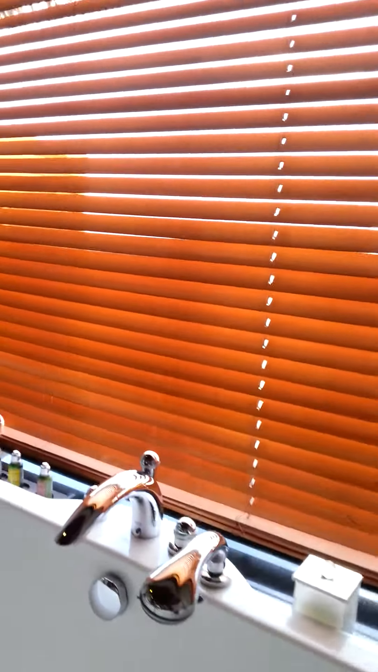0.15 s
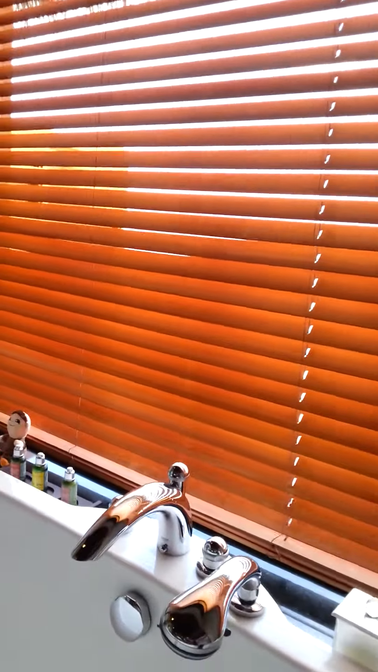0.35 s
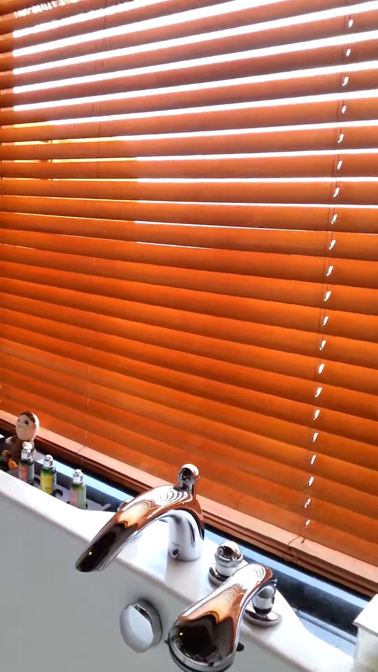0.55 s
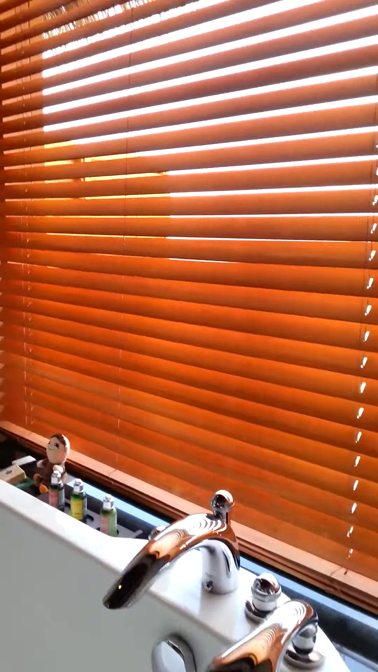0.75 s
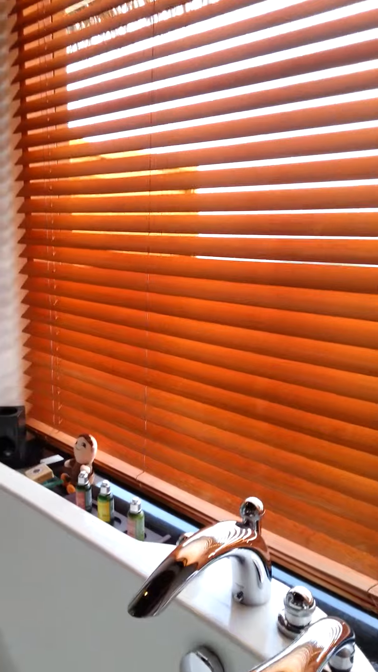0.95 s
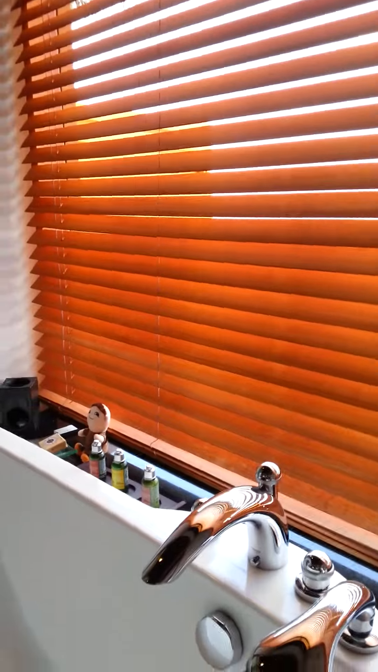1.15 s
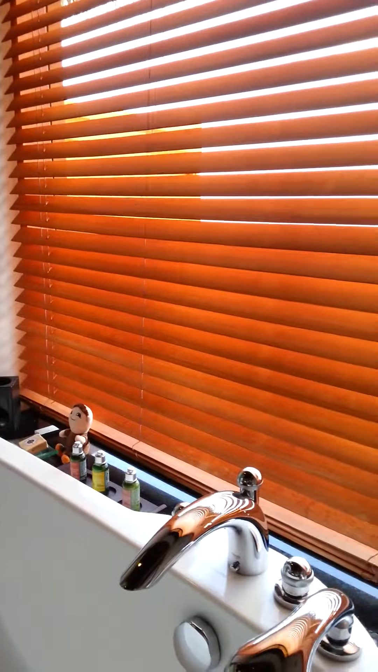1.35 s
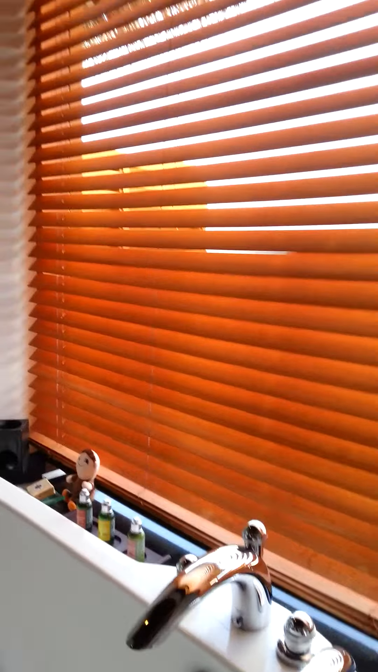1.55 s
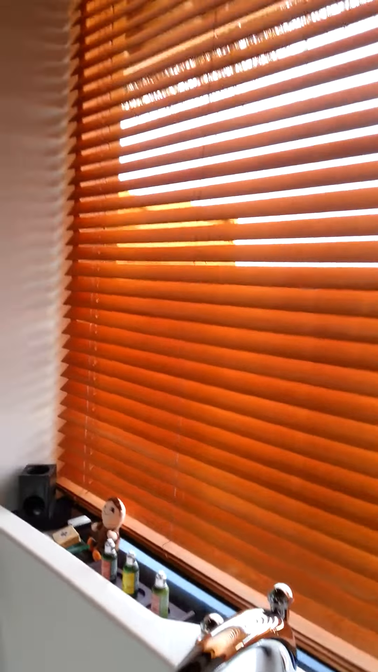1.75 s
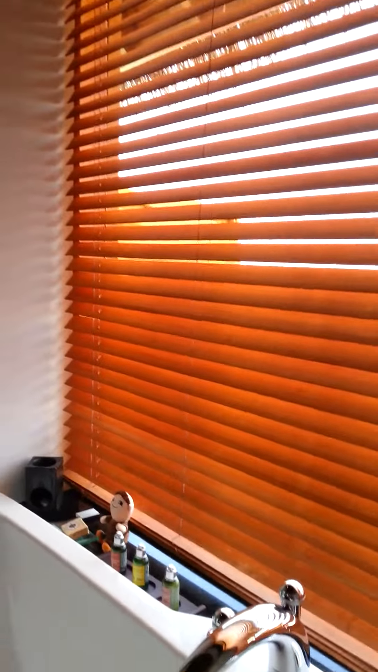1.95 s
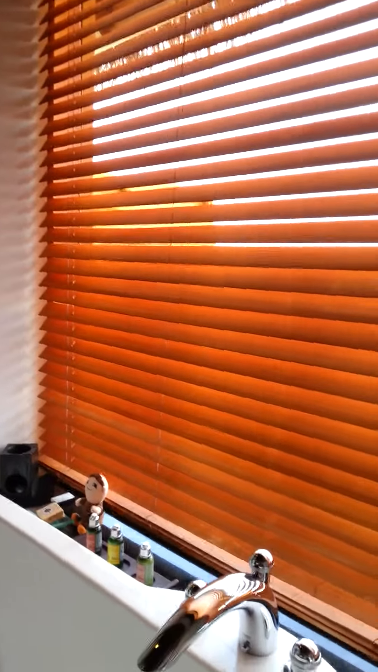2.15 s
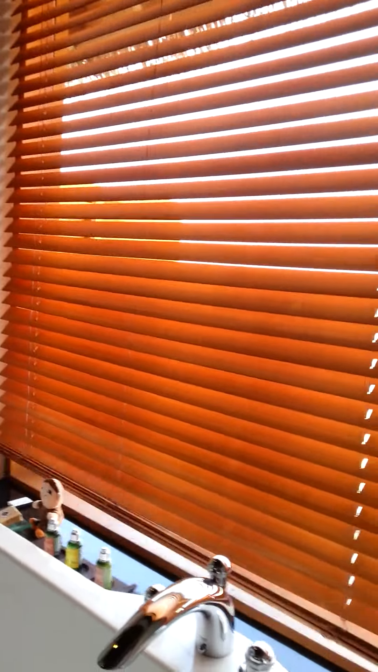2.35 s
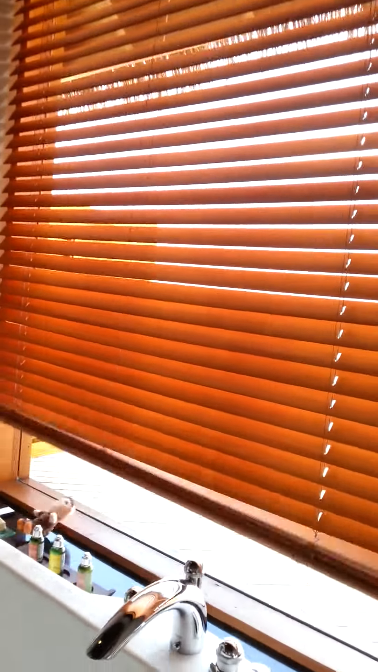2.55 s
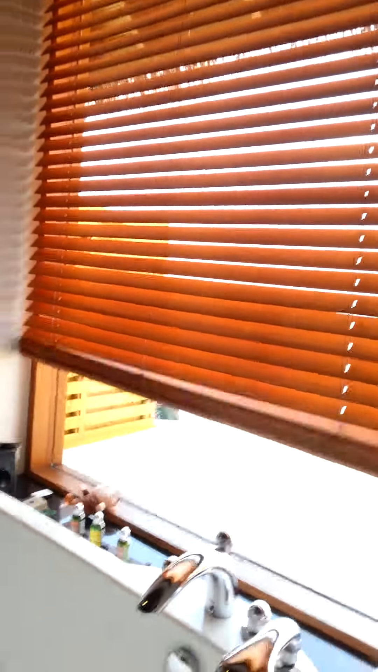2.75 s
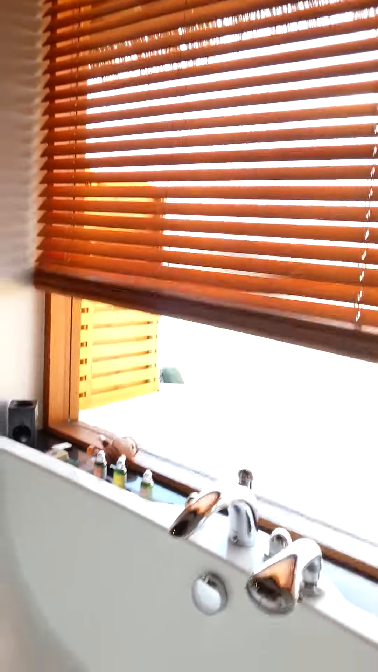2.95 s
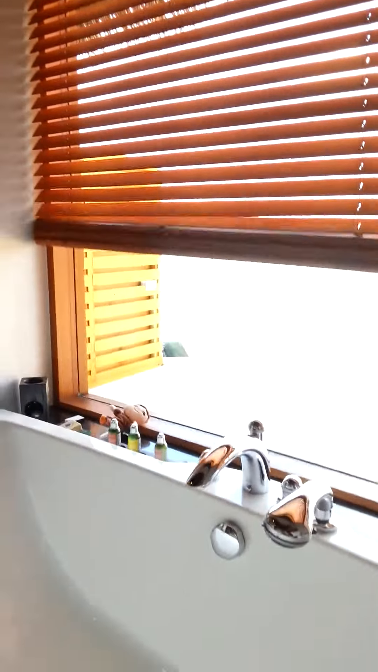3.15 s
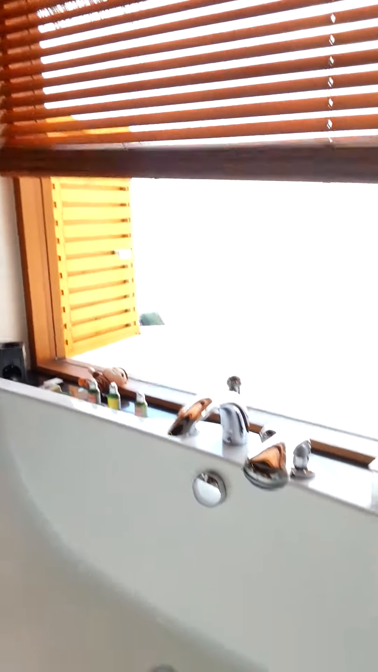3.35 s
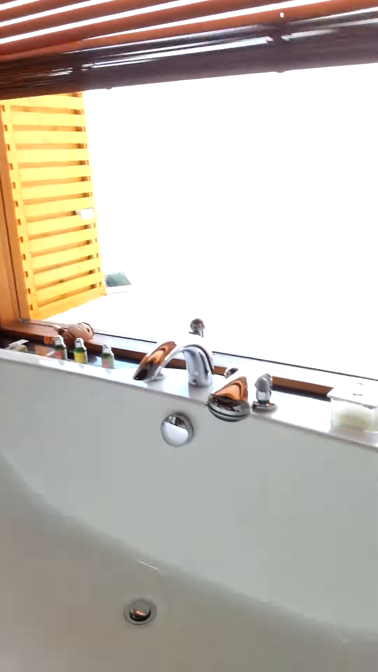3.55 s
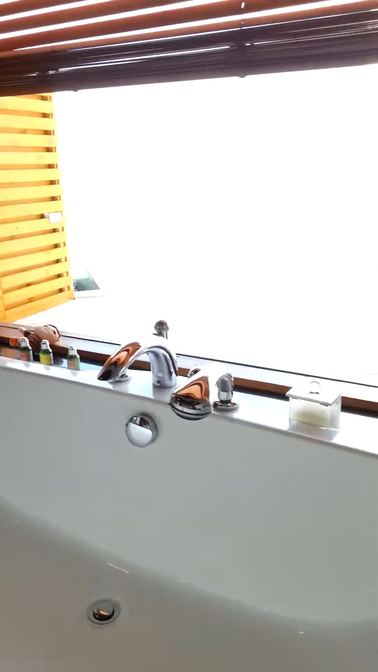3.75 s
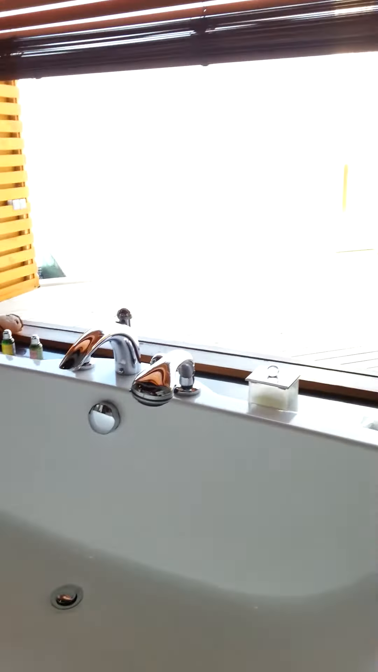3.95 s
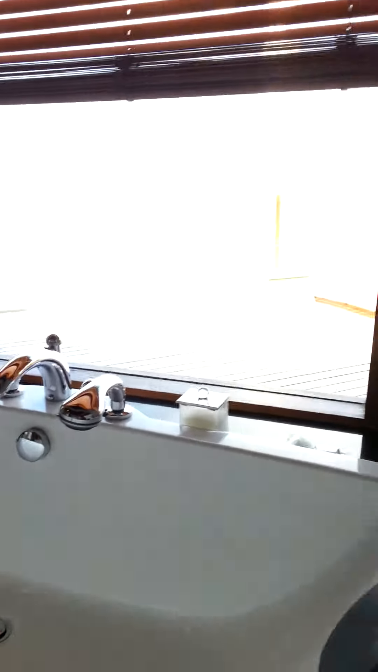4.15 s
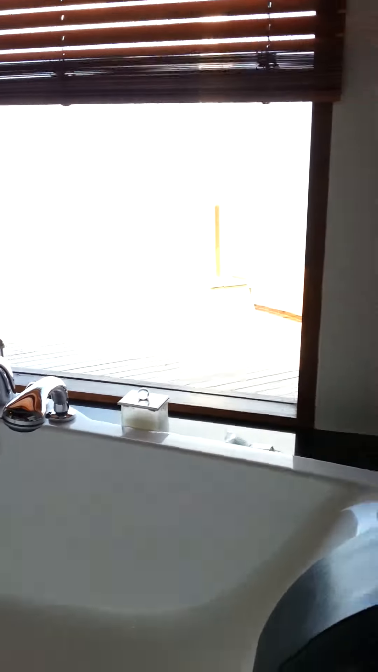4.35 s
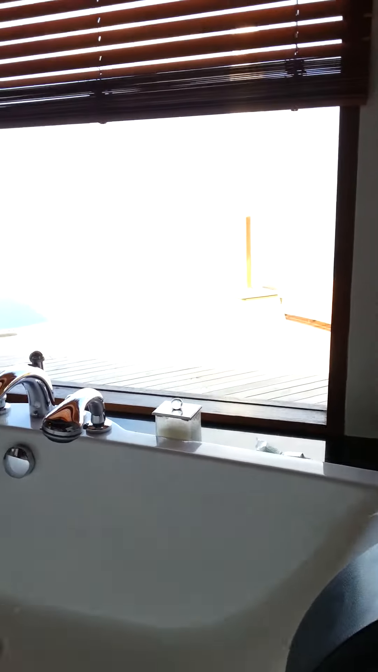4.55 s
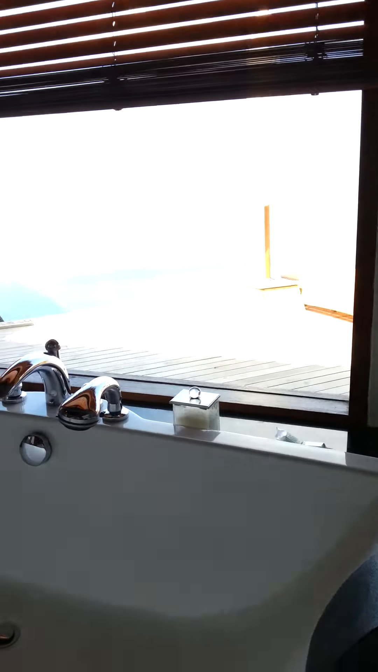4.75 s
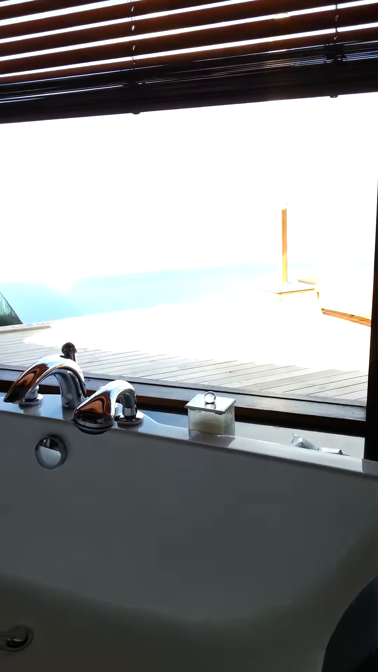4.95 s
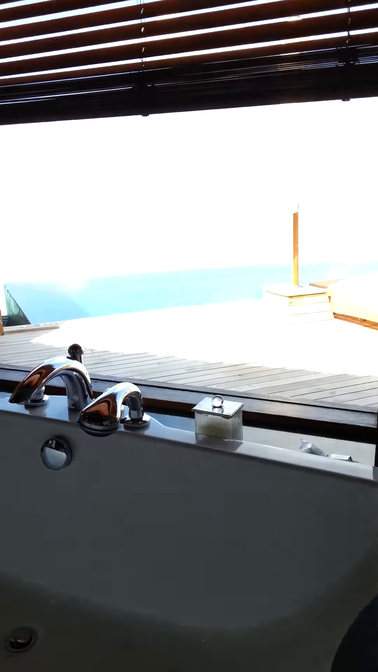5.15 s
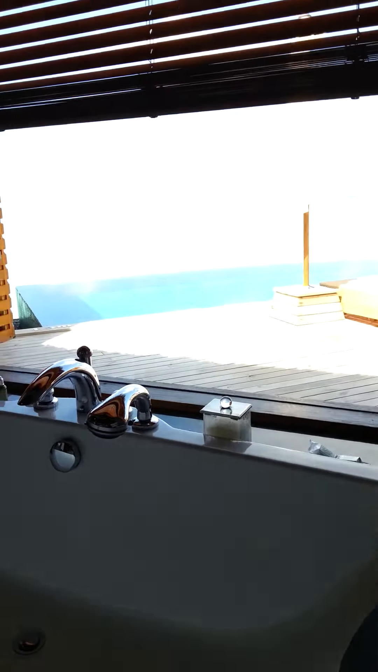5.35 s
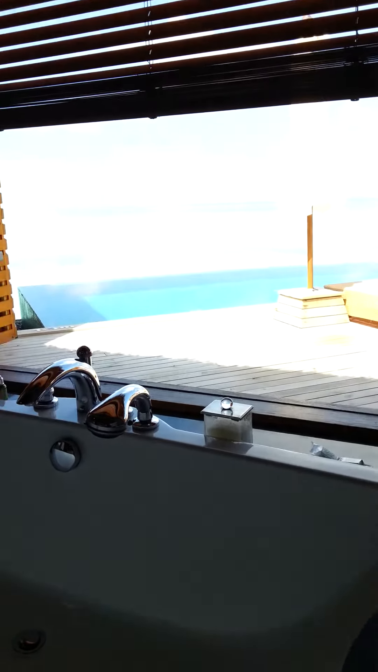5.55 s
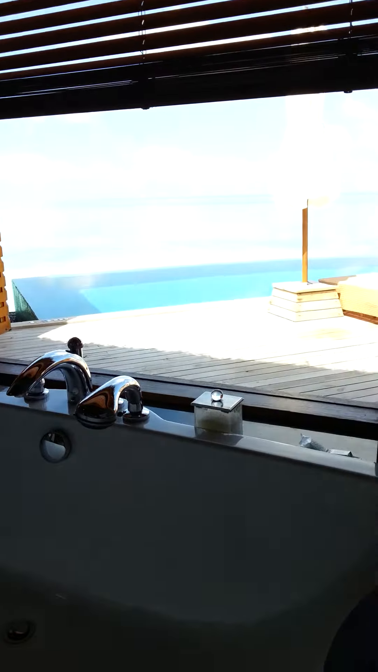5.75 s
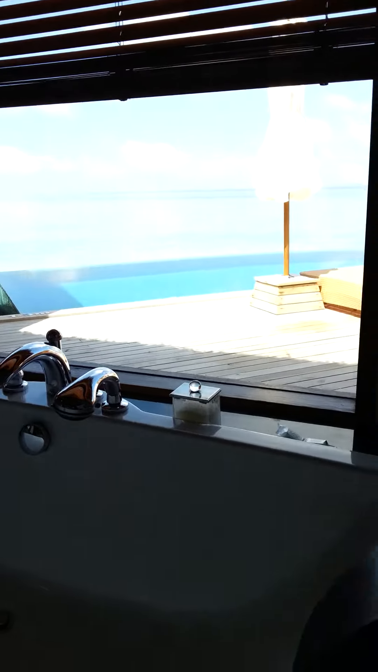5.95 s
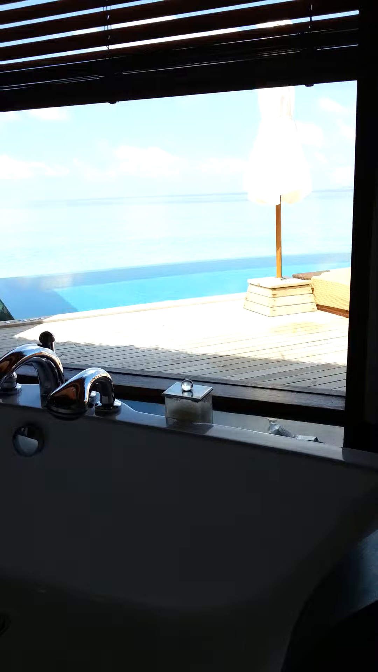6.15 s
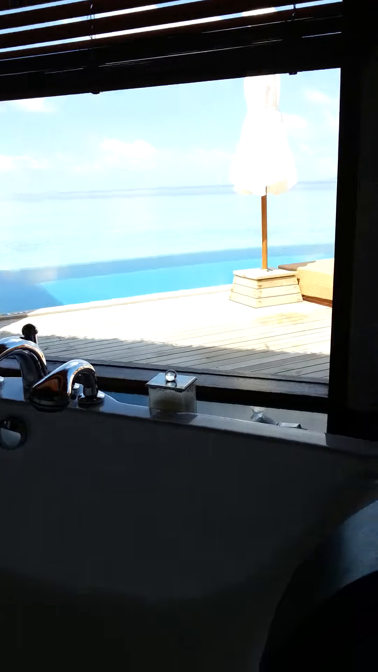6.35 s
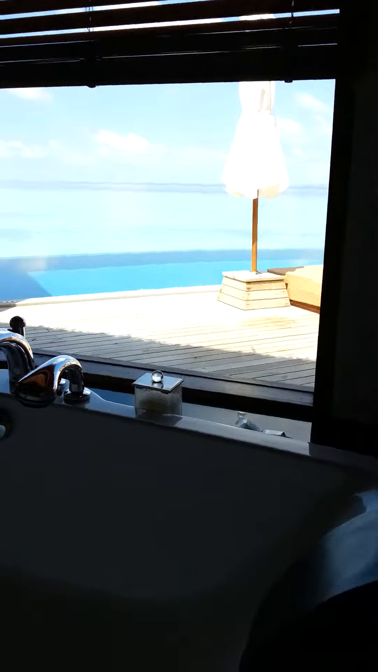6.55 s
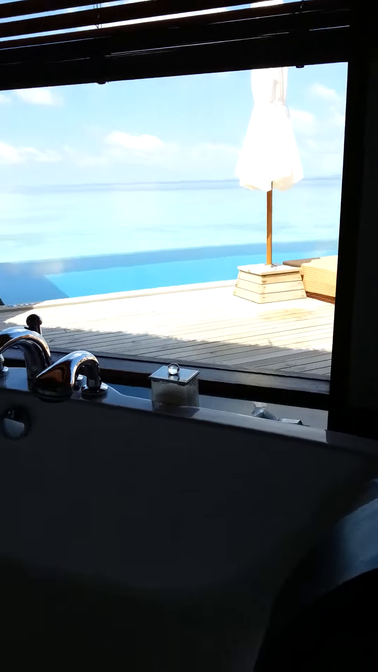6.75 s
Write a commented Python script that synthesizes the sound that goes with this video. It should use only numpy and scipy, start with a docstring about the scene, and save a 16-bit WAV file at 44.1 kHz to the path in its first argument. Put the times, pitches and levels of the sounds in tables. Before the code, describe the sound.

A hard-walled bathroom hums quietly, with steady ventilation, wavering low fan tones and slight hiss throughout. From 0 to 1.9 s there are only faint cord brushes and tiny taps around 0.1 and 0.8-1.2 s. At about 2.0 s the cord's slack is taken up with a small tap and soft bump, and the blind lifts gently. At 2.4 s a long haul bursts out very loudly: wooden slats clack and rattle densely, bright and sharp, with short hollow booms and cord hiss, easing towards 3.1 s. A second, shorter haul starts at 3.2 s, woodier, fading by 4 s into scraping. Dull bumps against the frame follow at 3.8, 3.9 and 4.1 s, faint squeaks near 4.4-4.6, and soft knocks at 4.9 and 5.1. A tiny bright close tick comes at 5.97 s, a knock and tap at 6.3, and a faint brush at 6.8.

```python
"""Bathroom with hard walls: a wooden venetian blind is hauled up over a low hum and steady ventilation.
First come faint cord brushes and light taps; then the slack is taken up and the blind lifts gently.
In two long hauls, slats of shaped noise clack and rattle, the stack booms in decaying sines, the cord hisses.
The stack bumps its frame, scrapes and settles; noise through narrow resonances squeaks faintly.
Late on, a tiny bright tick sounds close to the microphone, then a last knock, a tap and a soft brush."""
import sys
import numpy as np
from scipy import signal
from scipy.fft import rfft, irfft, next_fast_len
from scipy.io import wavfile
from scipy.ndimage import uniform_filter1d, map_coordinates

SR = 44100
rng = np.random.default_rng(int(sys.argv[2]) if len(sys.argv) > 2 else 0)


def write(x):
    x = np.atleast_2d(x).T
    wavfile.write(sys.argv[1], SR, np.round(np.clip(x, -1, 1) * 32767).astype(np.int16))


N = 303893
TIME = np.arange(N) / SR  # seconds into the scene
AGE = TIME[:SR * 3 // 4]  # seconds since a contact


# pulls on the cord: slack, a gentle lift, two long hauls:
# (start [s], speeding up [s], hold [s], slowing down [s], top speed [0-1])
PULLS = [(1.981, .06, .06, .25, 0.16), (2.091, .24, 0.07, .1, .4), (2.406, 0.042, .25, 1, 0.91),
         (3.21, 0.075, 0.068, .64, .8)]
# slats slapping onto the stack: (time [s], level [dB], low wood [dB re level], bright edge [dB re level],
# balance of the part shared by both sides over the part that differs [dB])
CLACKS = [(2.3094, -15, -8, -26.5, -1), (2.3804, -10, -12, -24, 8), (2.42, 0, -18.5, -9.5, 0),
          (2.4861, 5, -6.5, -24, -1.5), (2.5438, -1, -20, -17, 10.5), (2.67, 0, -21, -11.5, 3),
          (2.7898, -2, -26.5, -16, 4), (2.9029, -6, -20, -10, -4), (2.9263, -5.5, -28, -6, 2),
          (2.995, 0.5, -10, -8.5, 0.5), (3.2886, -2.5, -2, -22, 2), (3.3019, -0.5, -10, -28, 2),
          (3.3598, 1.5, -19, -12, 0.5), (3.38, -1, -23, -17, 1.5), (3.4516, -2, -16, -30, 1),
          (3.5233, -7.5, -2.5, -28, 0.5)]
# colours of slat wood, stacked slats and bright edges: (frequency [Hz], relative density [dB per Hz])
SLAT_COLOUR = [(240, -36.5), (400, -8), (638, -2), (731, -5.5), (1020, -3.5), (1510, -5.5), (1700, -9),
               (2070, -1.5), (4020, -7), (5040, -5.5), (6130, -11.5), (8290, -14.5), (12800, -23.5),
               (14700, -44)]
STACK_COLOUR = [(25, -33), (60, -26), (115, -11), (160, -4.5), (210, -0.5), (255, -7), (315, 3), (360, 2.5),
                (620, -1.5), (800, -2), (1200, -5), (1650, -0.5), (2100, -2), (3500, -51.5)]
EDGE_COLOUR = [(3000, -51), (6000, -4.5), (8200, 4.5), (11000, -1.5), (13200, -0.5), (14500, -8.5)]
# where the blind is heard: (frequency [Hz], left over right [dB])
LEAN = [(200, 0.5), (700, 0.2), (2600, 2.5), (5000, 0.8), (9000, -4), (14000, -1.5)]
RATTLE_DB, RUMBLE_DB, CORD_DB = -16, -30, -25  # slats, stack and cord at speed 1, before colouring
# each amplitude grows as this power of speed, so faster is brighter
RATTLE_POWER, RUMBLE_POWER, CORD_POWER = 2.08, 0.92, 2.74


def blind():
    """Slats slap and rattle, the stack rumbles and the cord hisses; rattles follow the pull's speed."""
    strokes = [top * stroke(start, rise, hold, slowing) for start, rise, hold, slowing, top in PULLS]
    haul_db = speed_db(np.max(strokes, axis=0))
    ring_db, scatter_db = 3.6, 3  # unevenness of resonances, of single contacts

    slat_rattle = rattle(RATTLE_DB + RATTLE_POWER * haul_db, rate=320, scatter_db=scatter_db,
                         t60=0.043, room_db=-3.0)
    stack_rumble = rattle(RUMBLE_DB + RUMBLE_POWER * haul_db, rate=350, scatter_db=scatter_db,
                          t60=0.04, room_db=-3)
    cord_hiss = rattle(CORD_DB + CORD_POWER * haul_db, rate=250, scatter_db=scatter_db,
                       t60=0.016, room_db=-7.5)
    slats = patchy(slat_rattle, ring_db)
    stack = patchy(stack_rumble, ring_db)
    edges = patchy(cord_hiss, ring_db)

    for s, db, wood_db, edge_db, shared_db in CLACKS:
        # spread() takes row 0 as the shared part and row 1 as the difference
        gain = amp(db + np.array([[shared_db], [-shared_db]]) / 2)
        slap = one_slat(blow(t60=0.037, rise=0.0012, room_db=-10.0), ring_db)
        thump = blow(t60=0.024, rise=0.00032, room_db=-10.5)
        click = blow(t60=0.034, rise=0.00026, room_db=-14.5)
        add(slats, s, gain * amp(-7.5) * slap)
        add(stack, s, gain * amp(wood_db - 9.0) * thump)
        add(edges, s, gain * amp(edge_db - 6.0) * click)

    wood = spread(coloured(slats, SLAT_COLOUR) + coloured(stack, STACK_COLOUR) + coloured(edges, EDGE_COLOUR))
    return filtered(wood, lambda hz: amp(np.outer([1, -1], along(LEAN, hz)) / 2))


# the whole stack jolting on its cords: (time [s], level before trim [dB], pitch [Hz])
JOLTS = [(2.484, -18, 342), (2.575, -12, 211), (2.655, -10.5, 483), (3.075, -15.5, 423), (3.286, -9, 304.4),
         (3.397, -12.5, 335), (3.547, -13, 315)]
JOLT_LOW_HZ = 110  # the stack is too small to radiate well below this


def jolts(t60, linger_db):
    """The stack booms briefly at one low, slightly unsteady pitch, which lingers in the room."""
    out = np.zeros((2, N))
    for s, db, pitch_hz in JOLTS:
        decay = amp(-60 * AGE / t60) + amp(linger_db - 60 * AGE / .5)
        ring = decay * (1 - np.exp(-AGE / 0.0025))
        drift = 0.02 * np.cumsum(rng.standard_normal(len(AGE)))
        offset = 0.14 * rng.standard_normal((2, 1))  # each side hears its own phase
        add(out, s, amp(db - 4) * ring * np.sin(2 * np.pi * pitch_hz * AGE + drift + offset))
    return filtered(out, lambda hz: (1j * hz / (JOLT_LOW_HZ + 1j * hz)) ** 2)


# light taps of cord, lock and slat edges:
# (time [s], level before trim [dB], pitch [Hz], room echo [dB re contact])
TAPS = [(.093, -36, 4200, -25), (.822, -41, 2130, -11), (.902, -37, 2380, -15), (1.073, -40.5, 4940, -8),
        (1.1414, -36, 3600, -13), (1.972, -27.5, 2860, -9), (2.0253, -15.5, 2150, -10.5),
        (2.1335, -27, 1800, -9.5), (2.234, -23.5, 840, -24), (2.2604, -20.5, 770, -20.5),
        (2.3916, -4, 5000, -23), (2.4253, 1, 4200, -18), (2.711, 0, 8400, -25), (2.732, 0.5, 3530, -26),
        (3.052, -7.5, 8700, -14), (3.216, -15, 8500, -15), (3.2612, -6, 6600, -14.5),
        (3.5544, -13.5, 6880, -12), (3.6228, -9.5, 2880, -15), (4.2935, -39.5, 2670, -7),
        (6.3697, -24, 2940, -17)]


def taps():
    """Light contacts excite one broad resonance each, some dry and some echoing in the room."""
    out = np.zeros((2, N))
    for s, db, pitch_hz, room_db in TAPS:
        contact = blow(t60=0.03, rise=0.00025, room_db=room_db)
        add(out, s, amp(db - 7.5) * coloured(contact, resonance(pitch_hz)))
    return spread(out)


# the bottom rail bumping the frame: (time [s], level before trim [dB], hard edge [dB re level])
KNOCKS = [(2.025, -27.5, -15), (3.784, -21, -25), (3.933, -24, -21), (4.102, -25.5, -16),
          (4.904, -20.5, -16.5), (5.134, -23, -21), (6.311, -18, -19)]
# colours of the frame and the rail: (frequency [Hz], relative density [dB per Hz])
FRAME_COLOUR = [(70, -37), (120, -17), (165, -3), (210, 6.5), (270, -10), (350, 3), (490, -5.5),
                (635, -1.5), (820, -11), (1250, -11.5), (1650, -8), (2100, -16), (4000, -39)]
RAIL_COLOUR = [(900, -13), (1800, 0), (2600, 0), (3500, -3), (4600, -12), (9000, -30), (14000, -33)]
# after each bump the rail lands once more, softer and duller
REBOUND_S, REBOUND_LOSS_DB, REBOUND_DULL_DB = .043, 7.5, 11


def knocks():
    """The padded stack bumps the frame and rebounds once; most sound comes by way of the walls."""
    frame, rail = np.zeros((2, 2, N))
    rebounds = [(s + REBOUND_S, db - REBOUND_LOSS_DB, edge_db - REBOUND_DULL_DB) for s, db, edge_db in KNOCKS]
    for s, db, edge_db in list(KNOCKS) + rebounds:
        add(frame, s, amp(db - 9) * blow(t60=0.15, rise=0.0069, room_db=-4.0))
        add(rail, s, amp(db + edge_db - 1.5) * blow(t60=0.13, rise=0.003, room_db=-5))
    return spread(coloured(frame, FRAME_COLOUR) + coloured(rail, RAIL_COLOUR))


# colour of the scrape: (frequency [Hz], relative density [dB per Hz])
RUBBING_COLOUR = [(120, -25), (220, 0), (340, 3), (620, 1), (900, -5.5), (1200, -20), (1570, -8),
                  (1850, -7), (2500, -19.5), (5000, -26), (12000, -39)]
SETTLE_START_S, SETTLE_DB, SETTLE_POWER = 3.483, -36.5, 1.36  # the stack's last swing along the frame


def settling():
    """The swaying stack scrapes softly along the frame in dense contacts until it hangs still."""
    swing = stroke(SETTLE_START_S, rise=0.14, hold=0.12, slowing=0.77)
    level_db = SETTLE_DB + SETTLE_POWER * speed_db(swing)
    scrape = rattle(level_db, rate=1200, scatter_db=1.5, t60=0.054, room_db=-3.5)
    return spread(coloured(scrape, RUBBING_COLOUR))


# squeaks of the swaying blind: (centre time [s], swell length [s], level [dB])
SQUEAKS = [(4.397, .035, -49), (4.498, .028, -50), (4.57, .05, -54)]
# resonances of the squeak: (frequency [Hz], width at -6 dB [Hz], relative level [dB])
SQUEAK_MODES = [(1900, 250, -2), (2350, 200, -1), (2620, 220, 1), (4070, 140, 0)]
# soft brushing of the cord: (centre time [s], swell length [s], level [dB])
BRUSHES = [(.35, 0.47, -58), (1.158, 0.077, -51.5), (2.165, 0.051, -43.5), (4.327, .07, -53),
           (4.5, 0.12, -54.5), (6.805, 0.12, -47)]
# colour of the brushing: (frequency [Hz], relative density [dB per Hz])
BRUSH_COLOUR = [(500, -4), (2200, 2), (5000, -3.5), (8000, -11), (14000, -11)]


def cord():
    """Faint rubbing: noise through narrow resonances squeaks, and broader noise swells brush."""
    def squeak_body(f):
        return sum(amp(db) / (1 + 2j * (f - hz) / width) ** 2 for hz, width, db in SQUEAK_MODES)
    squeak_level = sum(amp(db) * swell(s, length) for s, length, db in SQUEAKS)
    brush_level = sum(amp(db) * swell(s, length) for s, length, db in BRUSHES)
    squeaks = unit(filtered(noise(), squeak_body)) * squeak_level
    brushes = coloured(noise(), BRUSH_COLOUR) * brush_level
    return spread(squeaks + brushes)


def tick():
    """One tiny, very bright noise tick close to the microphone, with a soft low thud."""
    # colours: (frequency [Hz], relative density [dB per Hz])
    bright = [(4000, -37.0), (9000, -13.0), (12500, -14), (14500, 3), (16000, -17)]
    soft = [(80, -22), (250, 12), (600, -12), (2000, -33.0)]
    out = np.zeros((2, N))
    add(out, 5.966, amp(-26) * coloured(blow(t60=0.0079, rise=0.0007, room_db=-34), bright))
    add(out, 5.964, amp(-43.0) * coloured(blow(t60=0.061, rise=0.0022, room_db=-6.5), soft))
    return spread(out)


# the hum changes as the microphone moves through the room:
# (time [s], mains hum level [dB], fan whine gain [dB])
DRONE = [(0, -55, 2.5), (1.3, -63, 3.5), (3.3, -54, 5), (4.6, -52, -8), (6.89, -53, -2.5)]
# colour of the room's air: (frequency [Hz], relative density [dB per Hz])
AIR_COLOUR = [(20, -39), (60, -30.5), (90, -12), (130, -12.5), (165, -12), (205, -5.5), (280, -1.5),
              (350, -10), (560, -10), (850, -15.5), (1100, -20.5), (2400, -25), (6000, -35.5), (14500, -34)]
# fan tones: (frequency [Hz], level before the whine gain [dB])
FAN_LINES = [(135, -68.5), (200, -59), (223, -67), (275, -60), (301, -62), (312, -56.5), (535, -65.5),
             (776, -69.5), (860, -68.5)]
AIR_DB = -49  # the ventilation runs nearly steadily


def room_tone():
    """Ventilation rush of noise with wavering fan tones, a 100 Hz mains hum and even hiss."""
    hum_db, fan_db = curves(DRONE)
    rush = spread(coloured(noise(), AIR_COLOUR)) * amp(AIR_DB + 0.21 * wobble(3.4))
    hiss = amp(-59.5) * noise()
    mains = np.sqrt(2) * np.sin(2 * np.pi * 100 * TIME + .1 * wobble(2))
    hum = amp(hum_db + 0.44 * wobble(2.4)) * mains
    fan = sum(amp(db + 2.5 * wobble(2.6)) * np.sin(2 * np.pi * hz * TIME + wobble(4))
              for hz, db in FAN_LINES)
    return rush + hiss + hum + amp(fan_db) * fan


def stroke(start, rise, hold, slowing):
    """Speed of one movement, 0-1: it speeds up, holds and slows to a stop."""
    return np.interp(TIME, start + np.cumsum([0, rise, hold, slowing]), [0, 1, 1, 0])


def speed_db(speed):
    """Speed in decibels below full speed."""
    return 20 * np.log10(speed + 1e-6)


def rattle(level_db, rate, scatter_db, t60, room_db):
    """Random contacts (rate per second), each a fresh puff of noise, follow a level curve and echo."""
    strengths = amp(scatter_db * np.clip(rng.standard_normal(N), -2, 2))
    strikes = (rng.random(N) < rate / SR) * strengths
    energy = signal.fftconvolve(strikes ** 2, amp(-60 * AGE / t60) ** 2)[:N]
    direct = unit(np.sqrt(np.abs(energy)) * noise()) * amp(level_db)
    lingering = amp(-60 * AGE / 0.11) ** 2  # the room stores the energy and lets it out slowly
    echo_energy = signal.fftconvolve(np.mean(direct ** 2, axis=0), lingering / lingering.sum())[:N]
    return direct + amp(room_db) * np.sqrt(np.abs(echo_energy)) * noise()


def patchy(x, depth_db):
    """Different slats sound at each moment, so short-lived resonances come and go."""
    z = signal.stft(x, nperseg=1024)[2]
    field = uniform_filter1d(rng.standard_normal(z.shape[1:]), size=4, axis=0)  # over frequency
    field = uniform_filter1d(field, size=3, axis=1)  # over time
    gain = amp(depth_db * unit(field))
    return signal.istft(z * unit(gain), nperseg=1024)[1][:, :N]


def one_slat(x, depth_db):
    """Every slat rings with its own random set of resonances."""
    hz = np.cumsum(rng.uniform(100, 300, size=72))
    return coloured(x, np.c_[hz, depth_db * np.clip(rng.standard_normal(len(hz)), -2, 2)])


def resonance(pitch_hz):
    """The spectrum of one broad woody resonance."""
    return [(pitch_hz / 6, -20), (pitch_hz / 1.5, -7), (pitch_hz, 0),
            (pitch_hz * 1.5, -10), (pitch_hz * 3, -28), (pitch_hz * 8, -50)]


def blow(t60, rise, room_db):
    """A short chattering contact of decaying noise with the room's answer."""
    contact = noise(len(AGE)) * amp(-60 * AGE / t60)
    return (contact + amp(room_db) * room_tail()) * (1 - np.exp(-AGE / rise))


# how long the bathroom rings: (frequency [Hz], time to fall 60 dB [s])
ROOM_T60 = [(100, 0.46), (300, 0.61), (1500, 0.6), (4000, 0.82), (8000, 0.66), (14000, 0.14)]


def room_tail():
    """A fresh diffuse echo of noise, starting near rms 1; each frequency fades at its own rate."""
    hz, t, z = signal.stft(noise(len(AGE)), SR, nperseg=256)
    fading = z * amp(-60 * t / along(ROOM_T60, hz)[:, None])
    return signal.istft(fading, SR, nperseg=256)[1][:, :len(AGE)]


# how alike the two sides are: (frequency [Hz], left-right likeness [0-1])
ALIKE = [(60, 0.7), (250, 0.84), (450, 0.65), (800, 0.31), (1500, 0), (5000, 0.00067)]


def spread(pair):
    """Two unrelated signals, as mid and side, become left and right that are alike in the bass."""
    def mid_side(hz):
        turn = np.arccos(np.clip(along(ALIKE, hz), -1, 1)) / 2
        return np.array([np.cos(turn), np.sin(turn)])
    mid, side = filtered(pair, mid_side)
    return np.array([mid + side, mid - side])


def coloured(x, spectrum):
    """x through a causal (minimum-phase) body of that spectrum, at unit power gain."""
    def response(hz):
        cepstrum = irfft(np.log(unit(amp(along(spectrum, hz))) + 1e-6))
        half = len(cepstrum) // 2
        return np.exp(rfft(np.r_[cepstrum[0], 2 * cepstrum[1:half], np.zeros(half)]))
    return filtered(x, response)


def filtered(x, response):
    """x times a response of frequency, padded so that its end does not wrap round."""
    n = x.shape[-1]
    m = 2 * next_fast_len(n // 2 + 4096)
    return irfft(rfft(x, m) * response(np.fft.rfftfreq(m, 1 / SR)), m)[..., :n]


def add(track, s, sound):
    """Mix a sound into a track at time s."""
    part = track[:, max(round(s * SR), 0):][:, :sound.shape[1]]
    part += sound[:, :part.shape[1]]


def noise(size=N):
    """Two unrelated white noises."""
    return rng.standard_normal((2, size))


def wobble(rate):
    """A smooth random curve, rate knots a second."""
    return map_coordinates(rng.standard_normal(int(N * rate / SR) + 4), [TIME * rate])


def swell(s, length):
    """A smooth rise and fall around time s."""
    return np.exp(-2 * ((TIME - s) / length) ** 2)


def curves(rows):
    """One value per sample for each column after the time."""
    s, *cols = np.transpose(rows)
    return [np.interp(TIME, s, c) for c in cols]


def along(points, hz):
    """(Hz, value) points read on a log frequency axis."""
    f, v = np.transpose(points)
    return np.interp(np.log(hz + 1), np.log(f + 1), v)


def amp(db):
    """Decibels to gain."""
    return 10 ** (np.asarray(db) / 20)


def unit(x):
    """Scaled to rms 1."""
    return x / np.sqrt(np.mean(x ** 2) + 1e-20)


def scene():
    """The blind and its small noises in the humming room."""
    raising = blind() + jolts(t60=0.063, linger_db=-14.0) + taps()
    afterwards = settling() + knocks() + cord() + tick()
    return raising + afterwards + room_tone()


TOP_HZ = 14600  # band limit of the recorder


def record(dry):
    """The recorder clips at full scale, then cuts very steeply above its band limit."""
    return filtered(np.clip(dry, -1, 1), lambda hz: 1 / (1 + (hz / TOP_HZ) ** 200))


dry = scene()
out = record(dry)
write(out)
```